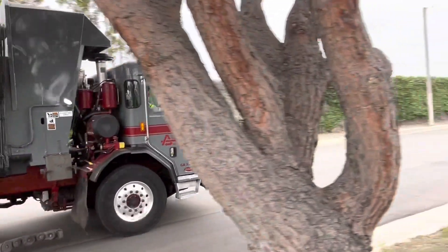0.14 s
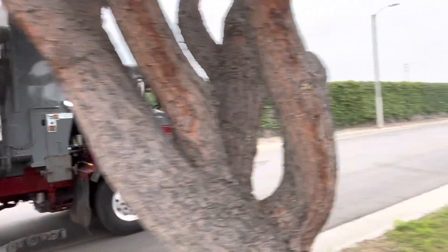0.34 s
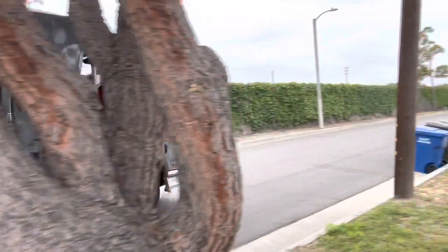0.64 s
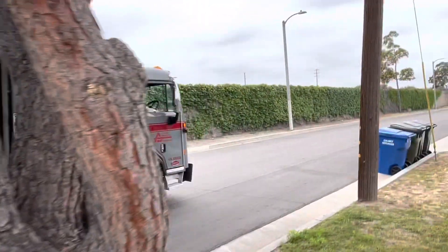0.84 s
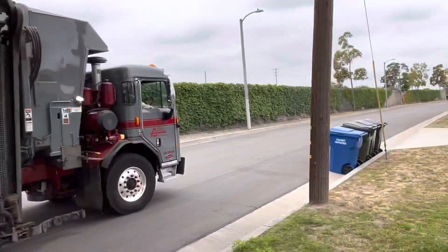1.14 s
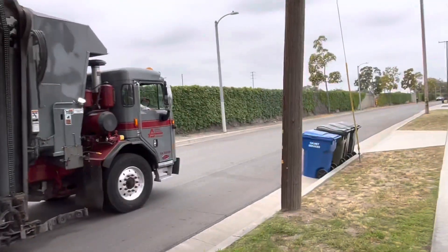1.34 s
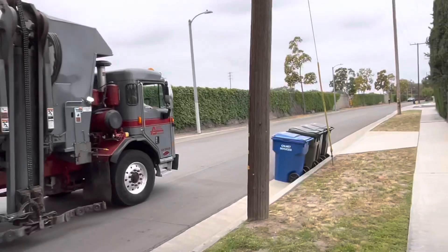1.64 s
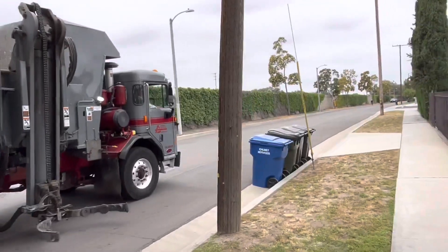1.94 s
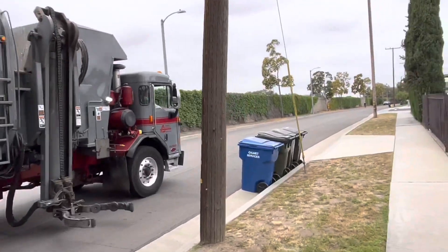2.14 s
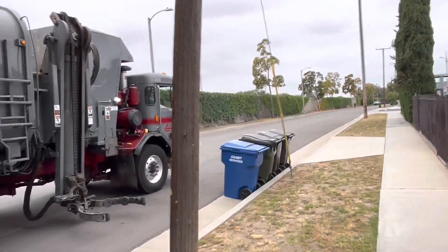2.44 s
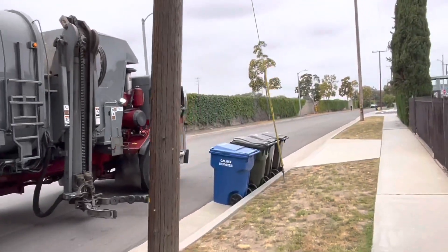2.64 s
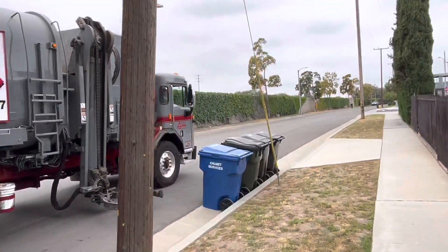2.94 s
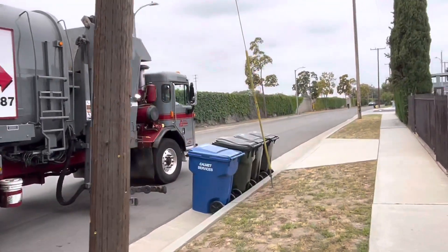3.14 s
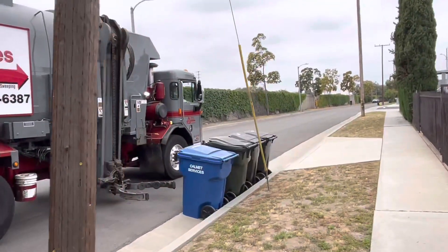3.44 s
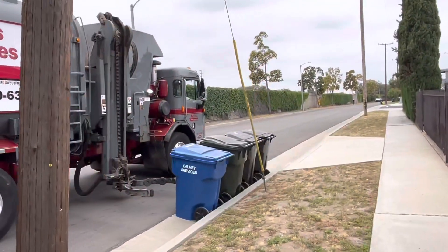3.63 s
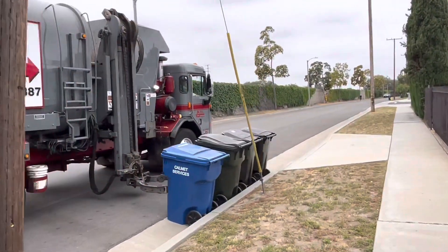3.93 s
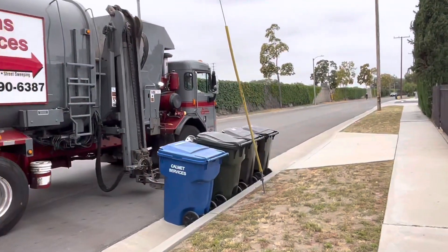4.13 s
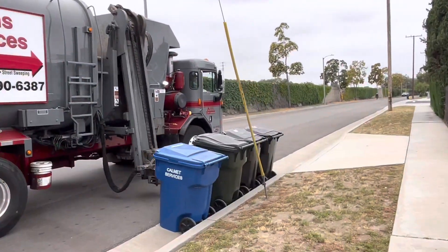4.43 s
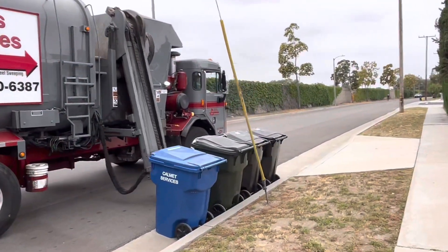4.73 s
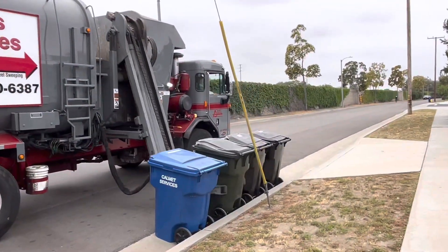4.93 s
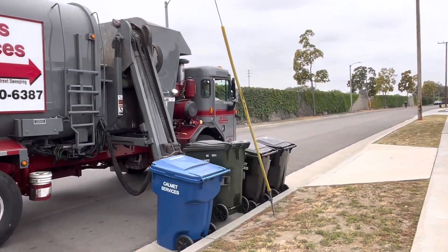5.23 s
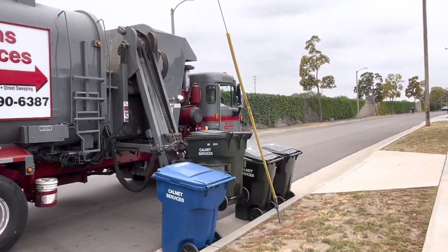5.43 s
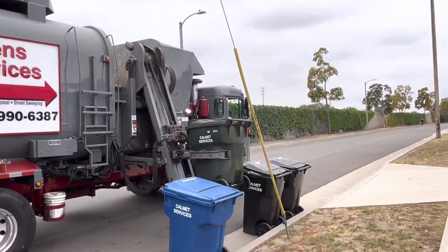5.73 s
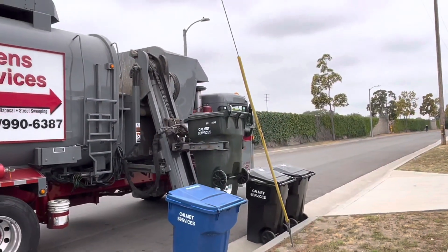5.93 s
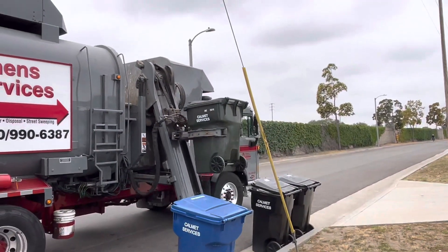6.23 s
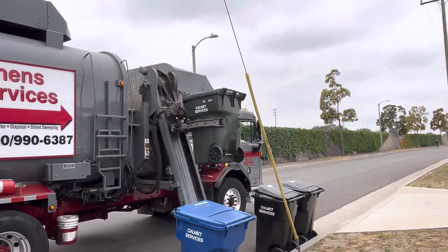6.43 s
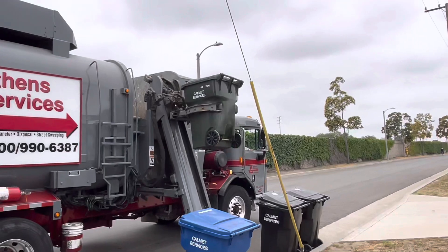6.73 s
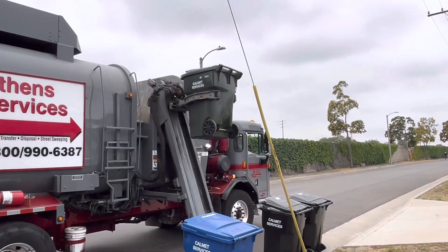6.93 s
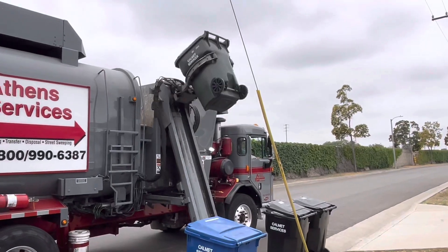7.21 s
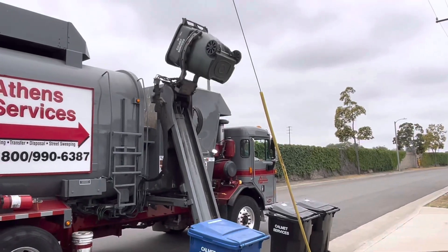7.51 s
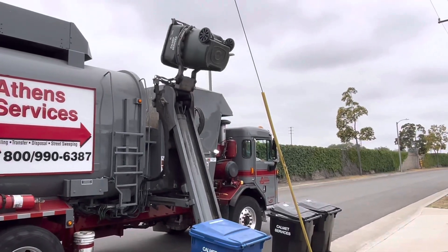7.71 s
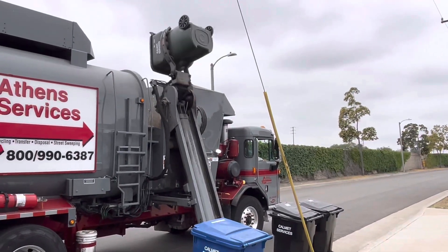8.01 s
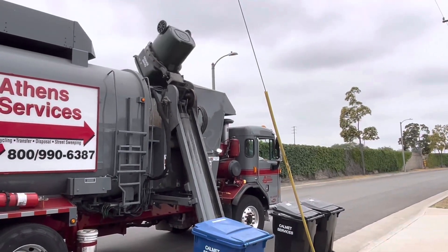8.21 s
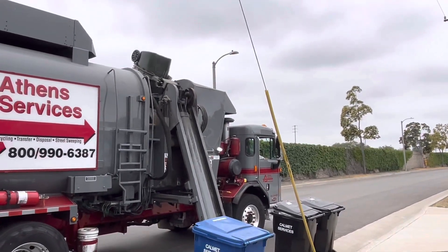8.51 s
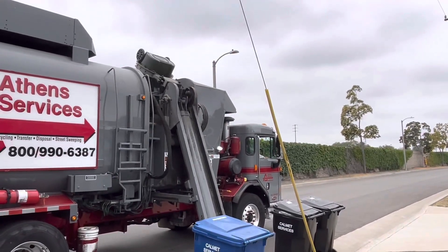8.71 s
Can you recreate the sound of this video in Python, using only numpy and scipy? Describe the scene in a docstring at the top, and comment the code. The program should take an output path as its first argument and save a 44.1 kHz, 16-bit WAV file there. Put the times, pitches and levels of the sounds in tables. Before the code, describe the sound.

A diesel garbage truck slows to the kerb with squealing brakes and air puffs, then its hydraulic arm clanks a bin up and dumps it.

```python
"""A suburban kerb: a diesel garbage truck slows down and stops with squealing brakes and puffs of air.
The engine speeds up to drive the hydraulic pump; the side arm grips a wheeled bin, clanks up its rail
and tips the rubbish into the steel hopper. Engine, oil and air are coloured noise and tones locked to
the crankshaft; squeals are swelling tones; knocks are bursts of noise that ring steel and hollow modes."""
import sys
import numpy as np
from scipy import signal
from scipy.fft import rfft, irfft, next_fast_len
from scipy.io import wavfile
from scipy.ndimage import uniform_filter1d

SR = 44100
rng = np.random.default_rng(int(sys.argv[2]) if len(sys.argv) > 2 else 0)


def digitize_waveform(pressure):
    """Quantize a signal to 16-bit integers and store it at the path in sys.argv[1].

    Rows of a 2-D input are taken as channels; values are limited to [-1, 1].
    """
    field = np.atleast_2d(pressure).T
    bounded = np.clip(field, -1, 1)
    quanta = np.round(bounded * 32767).astype(np.int16)
    wavfile.write(sys.argv[1], SR, quanta)


N = 390718
TIME = np.arange(N) / SR  # seconds
SIZE = next_fast_len(N + SR, True)  # transform length in samples
CUTOFF_HZ = 15700
IDLE_HZ = 14.4  # crankshaft turns per second

# Rubbish sliding out of the bin. Each row: time in seconds, relative level in dB.
TUMBLE_LEVEL = [(8.219, -40), (8.25, -20.5), (8.33, -19.5), (8.355, -20.5), (8.4, -20.5), (8.48, -27),
                (8.6, -26.5), (8.66, -43), (8.86, -46)]
# Spectrum of a dry steel crash. Each row: frequency in Hz, relative level in dB.
CRASH_SPECTRUM = [(120, -8.5), (250, 0.5), (600, 2.5), (1050, -0.5), (1300, -6), (1800, -5.5),
                  (3600, -11.5), (6400, -22), (8400, -27.5), (10300, -27.5), (13800, -22.5), (15500, -88)]
# Ringing of the steel arm and hopper. Each row: mode in Hz, relative level in dB, 60 dB decay in seconds.
STEEL_MODES = [(370, 9.5, 0.54), (475, -6, 0.6), (577, -12, 0.31), (804, 10, 0.15), (1040, 9, 0.088),
               (1159, 14.5, 0.1), (1542, 5, 0.11), (1816, 9, 0.092), (2305, -4, 0.18), (2690, 9, 0.14),
               (3144, 1.5, 0.089), (4000, -1, 0.14)]
# Hollow booming of bin and body. Each row: mode in Hz, relative level in dB, 60 dB decay in seconds.
HOLLOW_MODES = [(51, -6.5, 0.2), (86.7, -9, 0.23), (117, -2.5, 0.068), (222.6, -8, 0.63),
                (258.3, -12.5, 0.24), (310.4, -10.5, 0.49), (360, -18, 0.052)]


def from_db(db):
    """Decibels to gain."""
    return 10 ** (np.asarray(db) / 20)


def rms_one(x):
    """Scale to unit power."""
    return x / np.sqrt(np.mean(x ** 2) + 1e-20)


def in_time(rows):
    """Each column of a curve at every sample."""
    s, *columns = np.transpose(rows)
    return [np.interp(TIME, s, c) for c in columns]


def during(rows, fade=0.04):
    """Open over the span of a curve, fading to closed outside."""
    return np.clip(1 + np.minimum(TIME - rows[0][0], rows[-1][0] - TIME) / fade, 0, 1)


def opened(start, end, ramp):
    """From 0 to 1 and back, with ramps centred on start and end."""
    return np.clip(.5 + np.minimum(TIME - start, end - TIME) / ramp, 0, 1)


def spells(rows, ramp):
    """Gain of (start, end, dB) spells that add in power."""
    return np.sqrt(sum(from_db(db) ** 2 * opened(start, end, ramp) for start, end, db in rows))


def add(track, s, sound):
    """Mix a sound into a track from time s."""
    at = int(np.clip(s * SR, 0, N))
    track[at:at + len(sound)] += sound[:N - at]


def per_bin(points):
    """A (Hz, value) table on the transform's bins, interpolated over log frequency."""
    hz, value = np.transpose(points)
    return np.interp(np.log(np.fft.rfftfreq(SIZE, 1 / SR) + 1e-9), np.log(hz), value)


def coloured(x, spectrum):
    """Causal (minimum-phase) filter of unit power gain."""
    cepstrum = irfft(np.log(rms_one(from_db(per_bin(spectrum)))), SIZE)
    response = np.exp(rfft(2 * cepstrum[:SIZE // 2], SIZE) - cepstrum[0])
    return irfft(rfft(x, SIZE) * response, SIZE)[:N]


def noise():
    """White noise."""
    return rng.standard_normal(N)


def drift(rate, size=N):
    """Slow random wander around zero: straight lines between 2 * rate random knots a second."""
    knots = rng.standard_normal(4096)
    return np.interp(TIME[:size] * rate * 2, np.arange(len(knots)), knots)


def turning(hz):
    """Phase of something that turns at hz."""
    return 2 * np.pi * np.cumsum(hz * np.ones(N)) / SR


def singing(phase, blur, flutter_db):
    """A rough tone whose phase and level shake."""
    return from_db(flutter_db * drift(22)) * np.sin(phase + blur * drift(45))


def ring(force, modes):
    """Parallel decaying modes (two-pole resonators), with unit power gain in all."""
    out, total = 0, 0
    for k, (hz, db, t60) in enumerate(modes):
        radius, w = from_db(-60 / (t60 * SR)), 2 * np.pi * hz / SR
        sign = (-1) ** k  # neighbouring modes alternate in polarity
        gain = from_db(db) * np.sin(w) * np.sqrt(2 * (1 - radius * radius)) * sign
        out = out + signal.lfilter([0, gain], [1, -2 * radius * np.cos(w), radius * radius], force)
        total += from_db(db) ** 2
    return out / np.sqrt(total)


def struck(force, modes):
    """Every blow lands elsewhere and gives the modes new strengths."""
    scatter_db = 3.5
    return ring(force, [(hz, db + scatter_db * rng.standard_normal(), t60) for hz, db, t60 in modes])


def contacts(per_s, spread_db):
    """Random small impacts of uneven size and either sign, at unit power."""
    sizes = from_db(spread_db * np.minimum(rng.exponential(1, N), 3)) * rng.choice([-1, 1], N)
    return rms_one(sizes * (rng.random(N) < per_s / SR))


def diesel(crank, revs):
    """Six cylinders fire three times a turn; each firing puffs the exhaust and rattles the block."""
    # How hard the engine works. Each row: time in seconds, effort in dB above coasting.
    effort = [(0, 17.5), (.3, 11), (.8, 4.5), (1.6, 5), (1.95, 1), (2.25, 5), (3.1, -0.5), (4.2, 1),
              (4.55, 5), (4.95, 7), (5.22, 11), (5.6, 7.5), (6.95, 6), (7.2, 4.5), (8.2, 3), (8.86, 6.5)]
    # Each law: dB when coasting at idle, dB per dB of effort, dB per octave of speed.
    rumble_law = (-35, 0.3, 2.7)
    body_law = (-36.5, 0.51, 7)
    clatter_law = (-40.5, 1.0, 0.42)
    hiss_law = (-48, 0.85, 0.056)
    panel_law = (-55, 0.55, .3)
    # A tree, then a pole, hides the hiss. Each row: centre in seconds, half width in seconds, loss in dB.
    shadows = [(.83, 0.26, 6.5), (2.92, 0.42, 4)]
    # Spectra from exhaust rumble up to hiss. Each row: frequency in Hz, relative level in dB.
    rumble_spectrum = [(30, -58.5), (55, 12), (80, 10), (120, 12), (170, 8), (300, -45.5)]
    body_spectrum = [(90, -13.5), (150, 0), (210, 1.5), (300, -3), (410, -4.5), (600, -24.5), (1200, -56.5)]
    clatter_spectrum = [(250, -20.5), (450, 1.5), (700, 3.5), (1050, -0.5), (1600, -8.5), (2400, -11.5),
                        (3500, -21.5), (6000, -69)]
    hiss_spectrum = [(1500, -4.5), (3000, 4), (5000, -2.5), (7000, -6.5), (8400, -13.5), (9800, -7.5),
                     (14000, -9.5), (15500, -47)]
    firing_db, firing_db_per_octave = -40.5, 5
    laden_from_s, laden_db = 5.78, 11.5  # the firing note throbs harder once the engine carries the bin
    surge_db_s_per_hz = 0.36  # extra rumble while the engine speeds up
    repeated_db = -4.5  # repeating part of the clatter against its random part
    panel_swing_db = 6

    effort_db, octaves = in_time(effort)[0], np.log2(revs / IDLE_HZ)
    laws = (rumble_law, body_law, clatter_law, hiss_law, panel_law)
    levels = [db + share * effort_db + slope * octaves for db, share, slope in laws]
    rumble_db, body_db, clatter_db, hiss_db, panel_db = levels
    speeding_up = uniform_filter1d(np.gradient(revs) * SR, SR // 8)  # Hz per second
    surge_db = surge_db_s_per_hz * np.maximum(speeding_up, 0)
    shadow_db = sum(db * np.exp(-((TIME - s) / width) ** 2) for s, width, db in shadows)

    firing = 3 * crank
    cylinder = (firing / (2 * np.pi)).astype(int) % 6
    cylinder_db = np.array([-3.0, -0.5, 7.0, -26.0, 7.0, -22.0])[cylinder]  # uneven firing
    beat = rms_one(np.exp(-1.6 * np.cos(firing)) * from_db(cylinder_db))

    note_db = firing_db + firing_db_per_octave * octaves + surge_db
    note_db = note_db + laden_db * opened(laden_from_s, np.inf, 0.5)
    note = from_db(note_db + 1.2 * drift(21.0)) * np.sin(firing + 0.49 * drift(13.0))

    puffs = coloured(noise() * rms_one(1 + 0.063 * beat), rumble_spectrum)
    rumble = from_db(rumble_db + surge_db + 1.7 * drift(6.4)) * puffs
    throb = coloured(noise() * rms_one(1 + 0.17 * beat), body_spectrum)
    body = from_db(body_db + 2.0 * drift(5.4)) * throb

    # part of the clatter is the same at every firing
    knock = rng.standard_normal(1024)
    knock_phase = np.linspace(0, 2 * np.pi, len(knock), endpoint=False)
    repeated = rms_one(np.interp(firing, knock_phase, knock, period=2 * np.pi))
    rattle = rms_one(noise() + from_db(repeated_db) * repeated)
    rattle = coloured(rattle * rms_one(1 + 0.07 * beat), clatter_spectrum)
    clatter = from_db(clatter_db + 0.5 * drift(12.0)) * rattle

    breath = coloured(noise() * rms_one(1 + 0.12 * beat), hiss_spectrum)
    hiss = from_db(hiss_db - shadow_db + 0.96 * drift(11.0)) * breath
    # the engine shakes the bodywork
    panels = from_db(panel_db + panel_swing_db * drift(8.1)) * ring(noise(), STEEL_MODES)
    return note + rumble + body + clatter + hiss + panels


def whines(crank, revs):
    """Exhaust drone, timing gears and gearbox sink in pitch as the truck slows."""
    # Exhaust drone while slowing. Each row: time in seconds, level in dB before a lift of 1.5 dB.
    drone_level = [(0, -27.5), (.28, -39), (.53, -22), (.68, -34), (.8, -22.5), (1, -38), (1.2, -29),
                   (1.45, -26), (1.65, -41)]
    # Gearbox whine. Each row: time in seconds, pitch in Hz, level in dB.
    gear_curve = [(2.3, 420, -48), (2.55, 412, -41), (2.9, 396, -39), (3.2, 377, -43.5), (3.55, 339.8, -57)]
    # Rough upper partials of the gearbox. Each row: multiple of its whine, relative level in dB.
    gear_strands = [(5.149, -12.5), (5.7, -13)]
    # The timing gears' song comes and goes. Each row: start and end in seconds, relative level in dB.
    timing_swells = [(0, .16, 4), (.2, .38, 3.5), (.38, .56, -4), (.56, .74, 1.5), (.74, .87, -8),
                     (.87, 1.13, 2.5), (1.13, 1.4, 1)]
    timing_order, timing_db, timing_db_per_octave = 62.6, -54, 16.5  # order in cycles per crank turn
    upper_db, upper_fades_s = -51.5, 1.3

    drone_tone = np.sin(12 * crank + .55 * drift(30)) + from_db(-16) * np.sin(24 * crank)
    drone = from_db(in_time(drone_level)[0] + 1.5 + 2 * drift(14)) * during(drone_level) * drone_tone

    mesh = timing_order * crank
    mesh_db = timing_db + timing_db_per_octave * np.log2(revs / IDLE_HZ)
    mesh_tone = np.sin(mesh + 0.5 * drift(70) + 0.38 * np.sin(3 * crank))
    timing = spells(timing_swells, 0.028) * from_db(mesh_db + 4.5 * drift(25.4)) * mesh_tone
    upper = from_db(upper_db) * singing(1.63 * mesh, .9, 4) * opened(-np.inf, upper_fades_s, 0.52)

    gear_hz, gear_db = in_time(gear_curve)
    shaft = turning(gear_hz)
    strands = sum(from_db(db) * singing(k * shaft, 1.9, 4) for k, db in gear_strands)
    gearbox = from_db(gear_db + 2 * drift(27)) * during(gear_curve) * (np.sin(shaft) + strands)
    return drone + timing + upper + gearbox


def squeal(length, pitch_hz, db, waver=0.0016):
    """Stick-slip on one mode: a tone swells, flutters and dies; too short to lock in, it is rough and sags."""
    sag, lock_s, rough = .05, .06, .05  # most pitch lost (share), time to lock in, most pitch scatter (share)
    octave_db = -10.5
    along = np.clip(TIME[:SR] / length, 0, 1)
    loose = np.exp(-(length / lock_s) ** 2 / 2)  # near 1 when too short to lock in
    glide = 1 + sag * loose ** 2 * (.5 - along)
    flutter = 1 + (waver + rough * loose ** 2) * drift(400, size=SR)
    phase = 2 * np.pi * np.cumsum(pitch_hz * glide * flutter) / SR
    swell = np.abs(np.sin(np.pi * along)) ** .7 * from_db(2.2 * drift(35, size=SR))
    return from_db(db + 8.5) * swell * (np.sin(phase) + from_db(octave_db) * np.sin(2 * phase))


def brakes():
    """A low moan as the shoes bite, then high squeals, dry rubbing and puffs of vented air."""
    # Brake and pivot squeals. Each row: start and length in seconds, pitch in Hz, dB before squeal()'s lift.
    squeal_rows = [(2.11, .055, 5330, -49), (2.29, .08, 9950, -51), (3.27, .28, 8464, -43),
                   (3.35, .31, 9592, -35), (3.52, .11, 9600, -34), (3.39, .16, 9310, -44),
                   (3.78, .25, 9350, -53), (3.45, .13, 5140, -53), (3.48, .3, 8830, -47),
                   (3.77, .13, 5220, -41), (3.85, .11, 5180, -35), (3.965, .085, 5165, -41),
                   (3.82, .23, 7005, -46), (4.07, .125, 9665, -35), (4.2, .2, 9695, -37),
                   (4.41, .09, 9700, -39), (4.03, .37, 9400, -47), (4.98, .03, 7025, -46),
                   (5.02, .05, 5220, -41), (5.21, .04, 5400, -45), (7.345, .04, 5300, -42),
                   (7.385, .035, 5060, -36), (7.43, .03, 5050, -47)]
    # Air valves venting. Each row: start, hold and fade in seconds, level in dB.
    vents = [(1.877, .05, .04, -49), (2.04, 0.02, 0.066, -43), (2.339, .015, 0.014, -42),
             (3.3, 0.042, 0.13, -42), (3.613, 0.098, 0.052, -31.5), (4.4, 0.13, 0.078, -32),
             (4.944, 0.0053, 0.0076, -29), (8.628, 0.067, 0.031, -21.5)]
    # Brake shoes rub on the drums. Each row: start and end in seconds, level in dB.
    rubs = [(3.33, 3.58, -48), (3.97, 4.12, -45.5), (4.04, 4.1, -42), (4.24, 4.32, -44)]
    # Spectra of vented air and of rubbing. Each row: frequency in Hz, relative level in dB.
    air_spectrum = [(1500, -3), (3500, 4), (5000, 4.5), (7000, -4), (8300, 2.5), (10000, 8), (12500, 7.5),
                    (14200, 4), (15500, -36)]
    rub_spectrum = [(2000, -8), (3500, -3), (4400, 1.5), (6500, -4), (8000, -8), (14000, -22)]

    tones, flow, age = np.zeros(N), np.zeros(N), TIME[:SR]
    add(tones, 1.98, squeal(0.45, 1185, -43.5, waver=0.026))  # the moan
    for s, length, hz, db in squeal_rows:
        add(tones, s, squeal(length, hz, db))
    for s, hold, fade, db in vents:
        rise = np.minimum(age / 0.00093, 1)
        add(flow, s, from_db(db) * rise * np.exp(-np.maximum(age - hold, 0) / fade))
    rubbing = spells(rubs, 0.041) * from_db(2 * drift(40)) * coloured(noise(), rub_spectrum)
    return tones + rubbing + flow * coloured(noise(), air_spectrum)


def whistle(start, end, from_hz, to_hz, db):
    """Oil sings in a valve: the pitch glides with the flow, roughened by turbulence."""
    waver, wander, flutter_db = .04, .011, 4  # fast and slow share of the pitch, flutter of the level
    glide_hz = np.interp(TIME, [start, end], [from_hz, to_hz])
    hz = glide_hz * (1 + waver * drift(90) + wander * drift(8))
    level = from_db(db - 1 + flutter_db * drift(30)) * opened(start, end, 0.075)
    return level * np.sin(turning(hz))


def hydraulics(crank):
    """The pump hums with its ten gear teeth; in each stroke the valve rushes and sings and the chain ticks."""
    # Pump partials. Each row: multiple of the tooth note, relative level in dB.
    pump_partials = [(1, -2), (2, -17.5), (3, -18), (3.68, -30), (4.2, -22.5), (4.98, -33), (7.04, -39),
                     (8.95, -23.5), (11.04, -23.5), (20.43, -23), (31.8, -33), (34.35, -46)]
    # The pump's hum swells. Each row: start and end in seconds, level in dB.
    pump_swells = [(1.75, 1.97, -29.5), (2.28, 2.8, -31), (3.26, 3.73, -31), (3.98, 4.11, -28),
                   (4.2, 4.57, -26), (4.6, 5.05, -29.5), (5.68, 6.35, -25.5), (7.42, 8.52, -23.5)]
    # Arm strokes: reach, heave, lift, slowing near the top, top of the rail, tip, return.
    # Each row: start and end in seconds, oil level in dB, chain level in dB.
    strokes = [(4.516, 5.18, -46, -41.5), (5.139, 5.454, -35, -37), (5.45, 6.466, -37, -38.5),
               (6.45, 6.76, -39, -47), (6.76, 7.023, -34.5, -47.5), (7.021, 8.249, -47, -46.5),
               (8.548, 9.003, -53, -38)]
    # Oil whistling through valves. Each row: start and end in seconds, first and last pitch in Hz,
    # level in dB before whistle() takes off 1 dB.
    whistle_rows = [(4.502, 4.98, 1441, 1368, -38), (5.15, 5.509, 1480, 1790, -35.5),
                    (5.299, 5.599, 1403, 1550, -35), (5.581, 5.864, 1685, 1666, -36.5),
                    (5.6, 6.105, 1499, 1498, -37.5), (6.171, 6.426, 1496, 1512, -35),
                    (6.62, 6.997, 1467, 1510, -37.5), (7.094, 7.447, 1605, 1590, -48.5)]
    # Spectra of rushing oil and of the chain. Each row: frequency in Hz, relative level in dB.
    oil_spectrum = [(300, -3), (700, 6.5), (1000, 4), (1250, 6.5), (1520, 2.5), (2100, -2), (2700, -22),
                    (6000, -28)]
    chain_spectrum = [(2500, -51), (5000, 9.5), (8000, -8.5), (10500, 7.5), (13000, 9.5), (14500, 1),
                      (15500, -30)]
    pump_from_s, pump_rest_db, pump_ramp_s, valve_ramp_s = 1.8, -33, 0.058, 0.18
    engaged_s, released_s, high_order = 7.05, 8.3, 15  # high partials sound only while the bin tips

    teeth, engaged = 10 * crank, opened(engaged_s, released_s, pump_ramp_s)
    hum = 0
    for k, db in pump_partials:
        phase = k * teeth + (.3 + .07 * k) * drift(18 + 2 * k)
        gate = engaged if k > high_order else 1
        hum = hum + from_db(db + 1.9 * drift(6.4)) * np.sin(phase) * gate
    at_rest = from_db(pump_rest_db) * opened(pump_from_s, np.inf, pump_ramp_s)
    pressure = np.hypot(spells(pump_swells, pump_ramp_s), at_rest)

    surge = from_db(1.3 * drift(7) + 2.3 * drift(34))
    flow = surge * spells([(start, end, oil_db) for start, end, oil_db, _ in strokes], valve_ramp_s)
    travel = spells([(start, end, chain_db) for start, end, _, chain_db in strokes], valve_ramp_s)
    rush = coloured(noise() * (1 + 0.77 * np.sin(teeth)), oil_spectrum)
    # valve resonances: Hz, relative dB, 60 dB decay in seconds
    valve_modes = [(1478, 3.0, 0.098), (1680, -11.0, 0.2), (1900, -6.0, 0.05),
                   (2120, -7, 0.093), (2370, -12, 0.077)]
    sing = from_db(-4 + 1.4 * drift(2.7)) * ring(noise(), valve_modes)
    whistling = sum(whistle(*row) for row in whistle_rows)

    links = 0.58 * noise() + 0.39 * contacts(per_s=140, spread_db=7.0)
    chain = travel * from_db(1.8 * drift(7.4)) * coloured(links, chain_spectrum)
    return pressure * hum + flow * (rush + sing) + whistling + chain


def arm_and_bin():
    """Loose joints chatter at every knock; the struck part, the steel body and the hollow bin ring on."""
    # Knocks of chassis, arm and bin. Each row: start in seconds, crash and thud in relative dB,
    # chatter decay in seconds, note of the struck part in Hz, note in relative dB.
    knocks = [(.055, -32, -39, 0.091, 800, -23.5), (1.601, -41, -45, 0.007, 2660, -36),
              (1.72, -34, -38, .022, 2390, -48), (1.913, -30, -41, .003, 620, -25),
              (2.123, -36.5, -51, .077, 570, -33), (2.48, -39, -41, .012, 2900, -37),
              (2.713, -36, -48, 0.015, 590, -35), (3.597, -28, -28, .016, 596, -30),
              (3.791, -27.5, -29, .013, 594, -26), (4.914, -26, -33, 0.006, 780, -17),
              (4.944, -29, -15, 0.0096, 3200, -27.5), (5.062, -22.5, -13, 0.0094, 1930, -28),
              (5.074, -31, -18, 0.0096, 273, -19), (5.097, -40, -16, 0.015, 114.7, -20),
              (5.235, -40, -26, .019, 811, -24), (5.886, -38, -45, .005, 3500, -38),
              (6.365, -19, -24, 0.019, 1030, -22), (6.378, -23, -30, 0.0095, 1162, -13),
              (6.398, -27, -21, 0.0067, 340, -13.5), (6.441, -38, -31, 0.099, 292, -26.5),
              (6.762, -20.5, -13, 0.0069, 790, -21), (6.974, -16.5, -24, .013, 601.4, -13),
              (6.986, -20.5, -15, 0.0088, 883, -9), (6.992, -39, -13, 0.0084, 366, -12),
              (7.002, -27, -29, 0.0053, 1835, -17), (7.046, -40, -18.5, 0.015, 307, -25),
              (8.218, -36, -45, 0.0078, 2434, -27), (8.247, -20.5, -34, 0.0084, 713, -17),
              (8.275, -18, -24, 0.01, 1120, -28), (8.299, -18, -23, 0.012, 2300, -18),
              (8.317, -23, -18, .011, 3300, -18), (8.366, -9, -17, 0.013, 1060, -28),
              (8.382, -23, -12.5, 0.0079, 382, -15), (8.403, -20, -21, 0.0056, 711, -16),
              (8.425, -27, -21, .008, 418, -17), (8.44, -21.5, -16.5, 0.012, 2240, -25),
              (8.496, -21, -10, .005, 472, -15), (8.525, -25, -21, 0.0066, 621, -20),
              (8.543, -19.5, -25, 0.011, 1040, -23), (8.569, -18.5, -29, 0.012, 1800, -24),
              (8.604, -27, -21, 0.008, 1040, -20), (8.656, -37, -33, 0.01, 893, -20),
              (8.709, -38, -17.5, 0.0074, 700, -26), (8.744, -27, -27, 0.0094, 877, -24)]
    # Modes of a struck part. Each row: multiple of its note, relative level in dB, 60 dB decay in seconds.
    part_modes = [(1, 0, .06), (1.14, -4, .045), (1.52, -10, .06), (2.25, -13, .06), (3.4, -19, .06)]
    rise_s, tail_db, tail_s = 0.0024, -19, 0.085  # a knock rises, then chatters over a faint tail
    steel_db, crash_lift_db = -5, 1.2  # ringing steel and dry crash against the blow

    crash, thud, rings, age = np.zeros(N), np.zeros(N), np.zeros(N), TIME[:SR // 2]
    chatter = 1.085 * contacts(per_s=1400, spread_db=4.0) + 0.55 * noise()
    for s, crash_db, thud_db, chatter_s, hz, ring_db in knocks:
        decay = np.exp(-age / chatter_s) + from_db(tail_db) * np.exp(-age / tail_s)
        blow = np.minimum(age / rise_s, 1) * decay
        force = blow * np.take(chatter, int(s * SR) + np.arange(len(age)), mode="wrap")
        part = struck(force, [(min(hz * ratio, CUTOFF_HZ), db, t60) for ratio, db, t60 in part_modes])
        note = from_db(ring_db) * np.std(blow) * rms_one(part)
        steel = from_db(crash_db + steel_db) * struck(force, STEEL_MODES)
        add(crash, s, from_db(crash_db) * force)
        add(thud, s, from_db(thud_db) * blow * rng.standard_normal(len(age)))
        add(rings, s, note + steel)
    return from_db(crash_lift_db) * coloured(crash, CRASH_SPECTRUM) + rings + ring(thud, HOLLOW_MODES)


def tumbling(steel_db=-10, boom_db=-11):
    """Loose rubbish drums on the hopper in uneven clumps."""
    clumps = rms_one(from_db(4 * drift(30)) * (contacts(per_s=500, spread_db=4) + .4 * noise()))
    force = from_db(in_time(TUMBLE_LEVEL)[0]) * during(TUMBLE_LEVEL) * clumps
    steel = from_db(steel_db) * ring(force, STEEL_MODES)
    boom = from_db(boom_db) * ring(force, HOLLOW_MODES)
    return coloured(force, CRASH_SPECTRUM) + steel + boom


def rubbish(count=30, level_db=-1, t60=0.065):
    """Single bottles, tins and bags land in the hopper, each with a two-tone ring of its own."""
    out, age = np.zeros(N), TIME[:SR // 6]
    times, levels = np.transpose(TUMBLE_LEVEL)
    for when, pitch, size, overtone in rng.random((count, 4)):
        s = times[0] + when * (times[-1] - times[0])
        hz = 280 * 5 ** pitch
        tone = np.sin(2 * np.pi * hz * age) + 0.49 * np.sin(2 * np.pi * hz * (2.1 + overtone) * age)
        item_db = np.interp(s, times, levels) + level_db + 8.1 * size - 5 * pitch
        add(out, s, from_db(item_db) * tone * np.exp(-np.log(1000) * age / t60))
    return out


def street(x, t60=0.091):
    """Scatter from road, fence and truck side splits the channels; microphone ports shift level and phase."""
    # Likeness of the two channels. Each row: frequency in Hz, likeness from 0 to 1 (held to 0.98 at most).
    likeness = [(60, 1), (250, 0.92), (500, 0.76), (900, 0.63), (1450, 0.13), (2000, 0.94), (3700, 0.48),
                (4700, 0.25), (5700, 0.029), (8000, 1), (14000, 0.75)]
    # Level between the channels. Each row: frequency in Hz, left over right in dB.
    lean = [(60, 1), (400, 1), (850, 4.5), (1500, 3), (2600, -2), (3700, 7), (4700, 12.5), (5700, 3.5),
            (7500, -1.5)]
    # Phase between the channels. Each row: frequency in Hz, left ahead of right in radians.
    lead = [(100, .15), (900, .35), (1600, .7), (2200, 1), (3100, 1.9), (3900, .7), (5000, .5),
            (6500, -1.3), (7500, -2.4), (8000, -3.1), (8700, -3.2), (9600, -4.4), (11200, -6.28),
            (13300, -6.3)]
    scatter = rfft(noise() * from_db(-60 * TIME / t60), SIZE)
    side = scatter / np.sqrt(np.mean(np.abs(scatter) ** 2))
    alike = np.clip(per_bin(likeness), 0, .98)
    side = side * np.sqrt((1 - alike) / (1 + alike))
    ports = from_db(per_bin(lean) / 2) * np.exp(.5j * per_bin(lead))  # half to each channel
    tone_curve = [(300, 0.5), (1000, -1.38), (2200, 1.7), (5000, -1.5), (9000, 3.5), (12000, -5)]  # Hz, dB
    channels = np.array([(1 + side) * ports, (1 - side) / ports])
    return irfft(rfft(x, SIZE) * from_db(per_bin(tone_curve)) * channels, SIZE)[:, :N]


def scene():
    """All parts of the truck, heard from the pavement."""
    # Speed of the crankshaft. Each row: time in seconds, turns per second in Hz.
    rev_curve = [(0, 33.3), (.1, 32.5), (.2, 27.9), (.5, 27), (.74, 25), (1, 22.7), (1.2, 20.8),
                 (1.6, 18.2), (1.8, 15.5), (2.08, 13.7), (2.36, 16.5), (3.4, 13.6), (3.68, 12.9),
                 (4.02, 11.6), (4.17, 10.5), (4.42, 13.4), (4.68, 16.7), (4.9, 18), (5.15, 17.2),
                 (5.6, 15.4), (5.8, 14.7), (7.6, 14.63), (8.28, 14.56), (8.86, 17.2)]
    revs = in_time(rev_curve)[0]
    crank = turning(revs * (1 + 0.00308 * drift(14)))
    engine = diesel(crank, revs) + whines(crank, revs)
    machinery = brakes() + hydraulics(crank) + arm_and_bin()
    return street(engine + machinery + tumbling() + rubbish())


def record(dry):
    """Deep bass is rolled off, peaks are rounded, the top is cut."""
    x = signal.sosfilt(signal.butter(2, 28, "high", fs=SR, output="sos"), dry)
    rounded = 1.3 * np.tanh(x / 1.3)
    return signal.sosfilt(signal.cheby2(16, 70, CUTOFF_HZ, fs=SR, output="sos"), rounded)


dry = scene()
out = record(dry)
digitize_waveform(out)
```